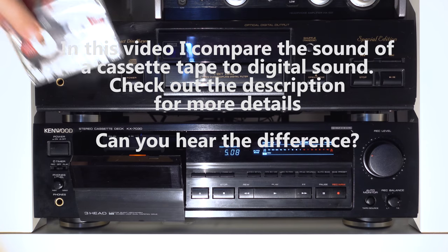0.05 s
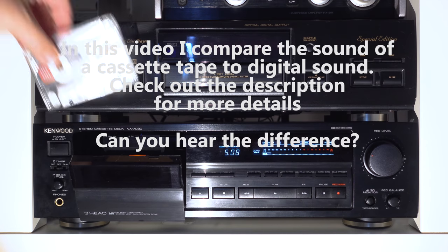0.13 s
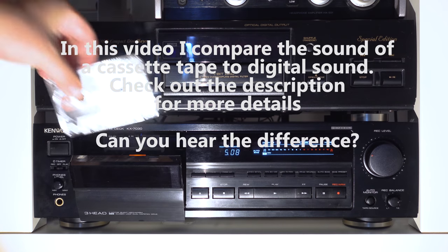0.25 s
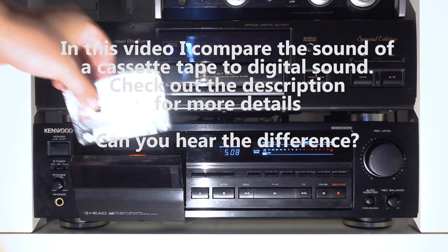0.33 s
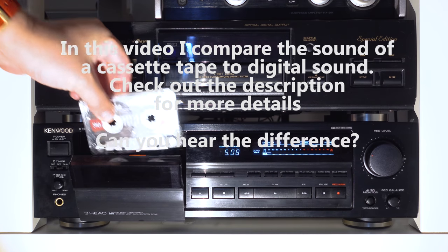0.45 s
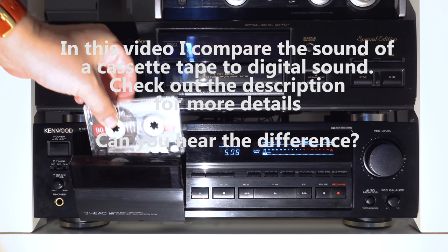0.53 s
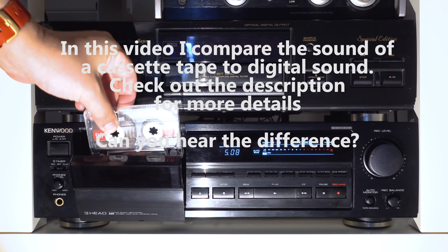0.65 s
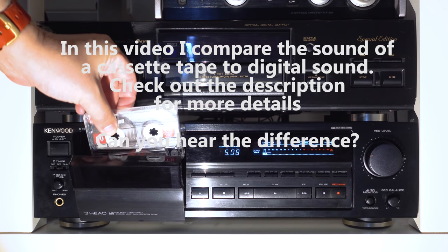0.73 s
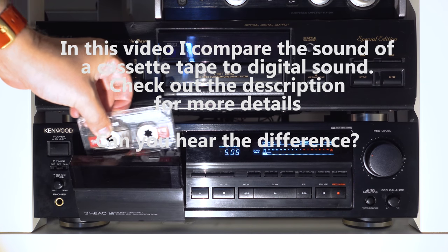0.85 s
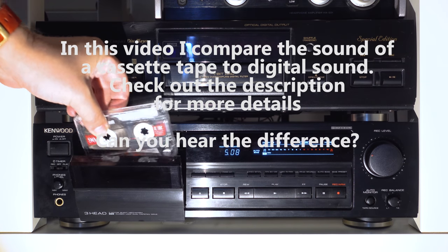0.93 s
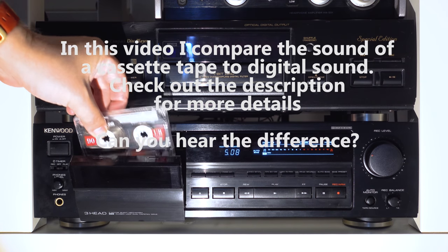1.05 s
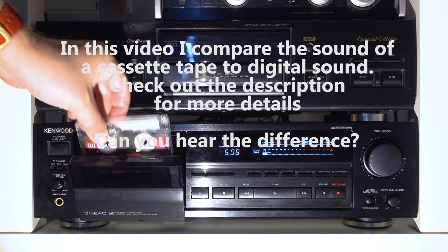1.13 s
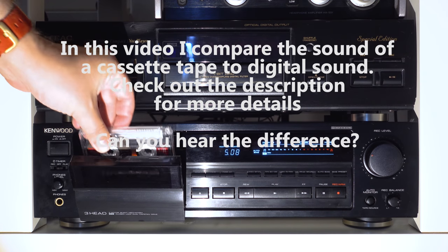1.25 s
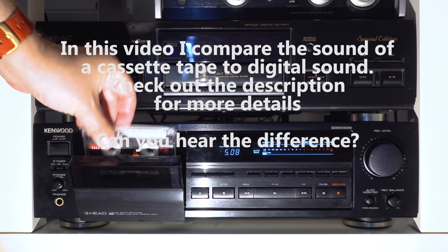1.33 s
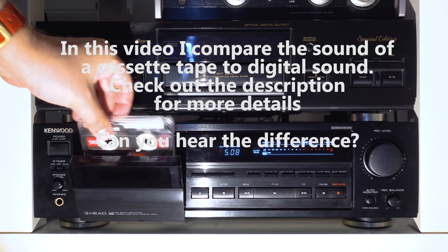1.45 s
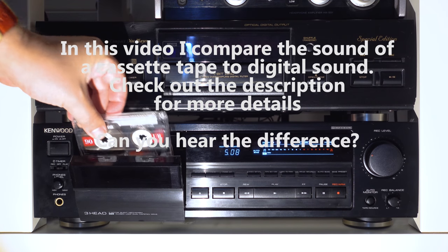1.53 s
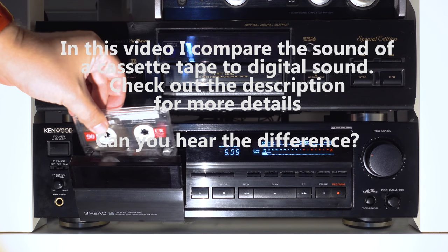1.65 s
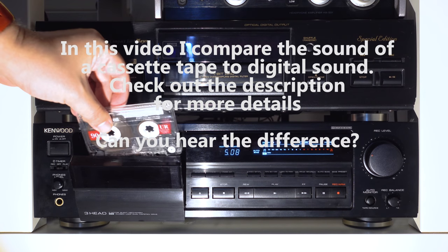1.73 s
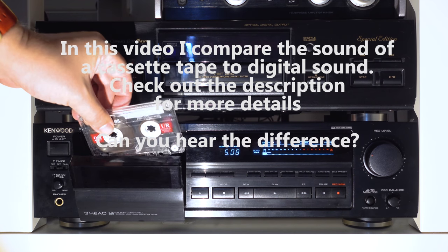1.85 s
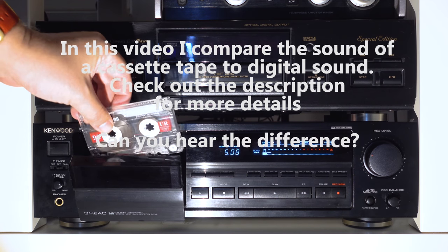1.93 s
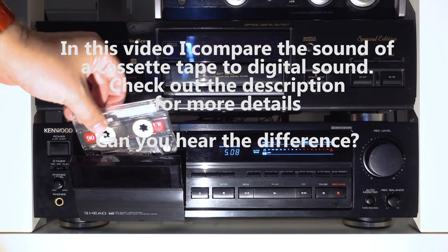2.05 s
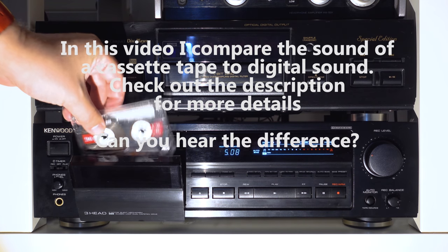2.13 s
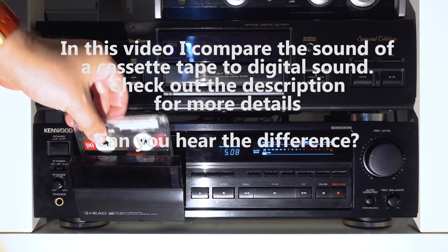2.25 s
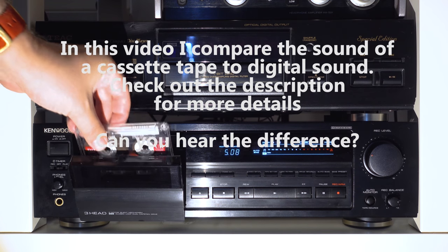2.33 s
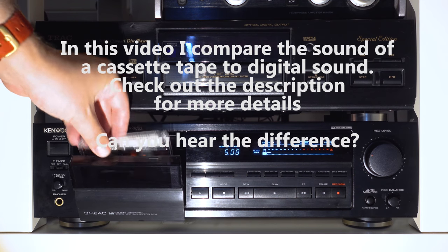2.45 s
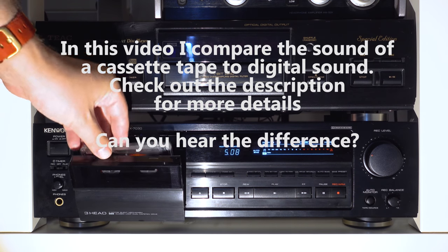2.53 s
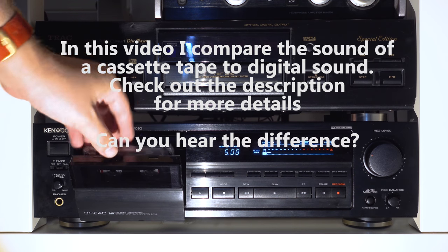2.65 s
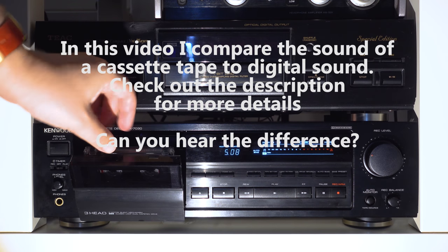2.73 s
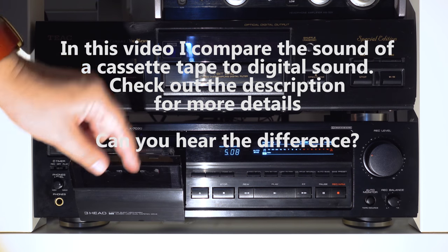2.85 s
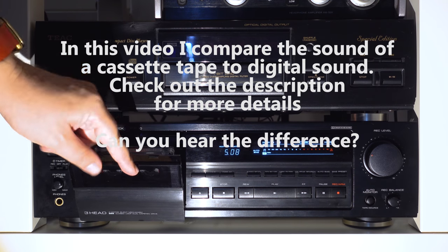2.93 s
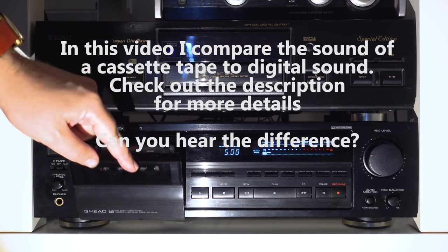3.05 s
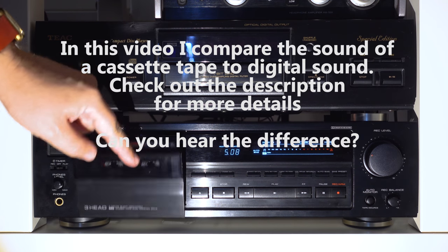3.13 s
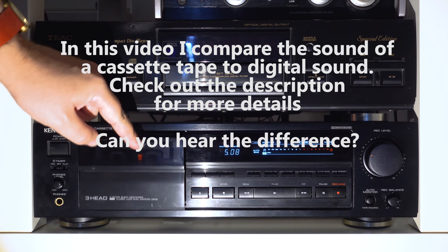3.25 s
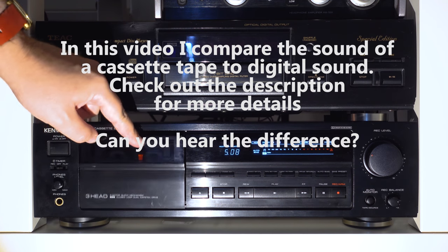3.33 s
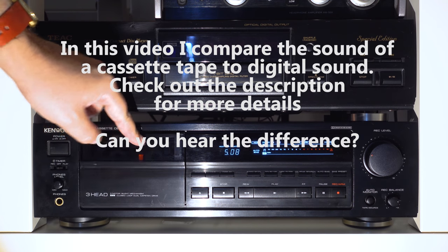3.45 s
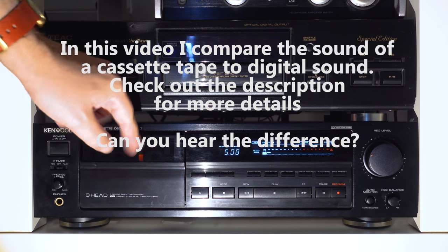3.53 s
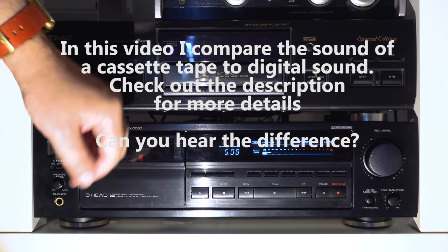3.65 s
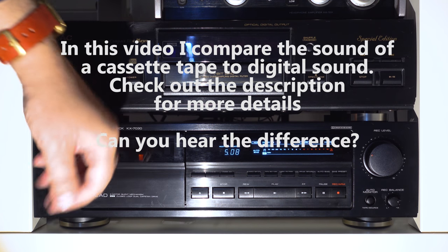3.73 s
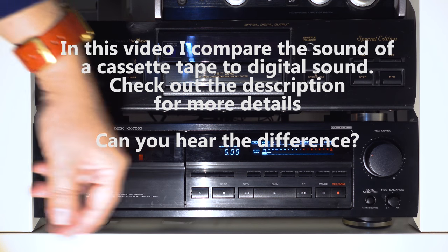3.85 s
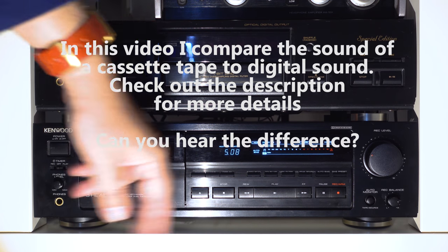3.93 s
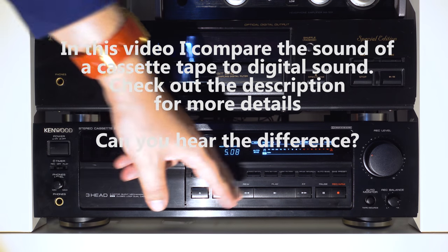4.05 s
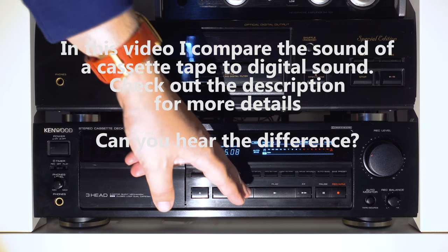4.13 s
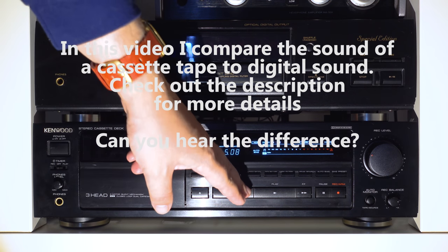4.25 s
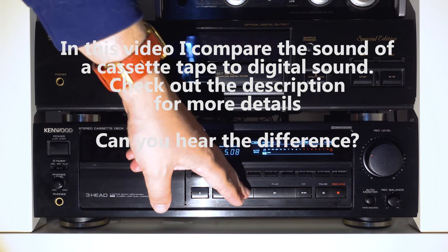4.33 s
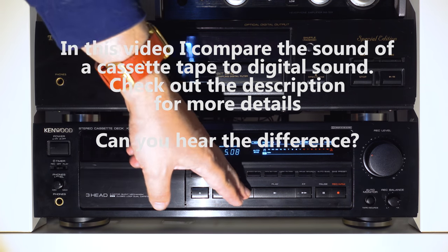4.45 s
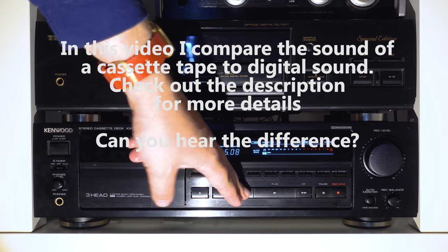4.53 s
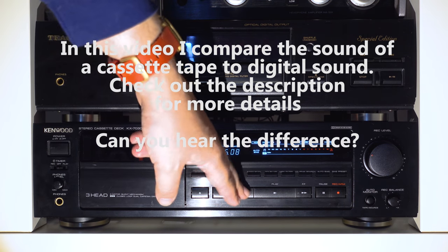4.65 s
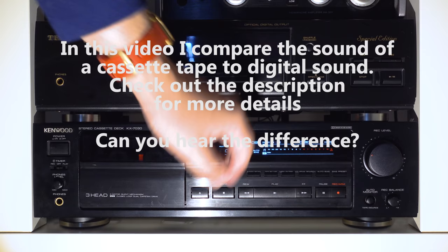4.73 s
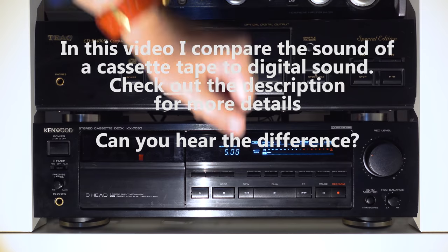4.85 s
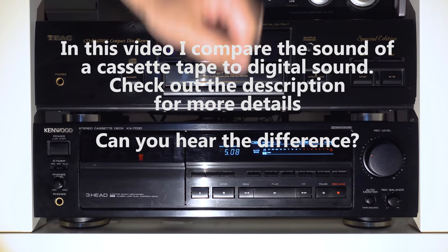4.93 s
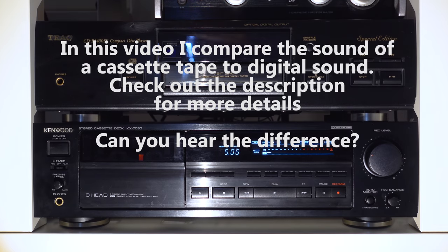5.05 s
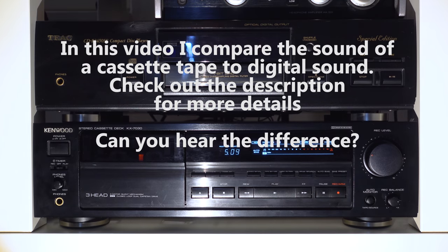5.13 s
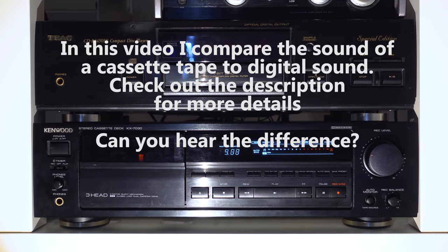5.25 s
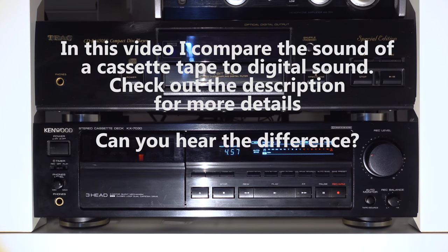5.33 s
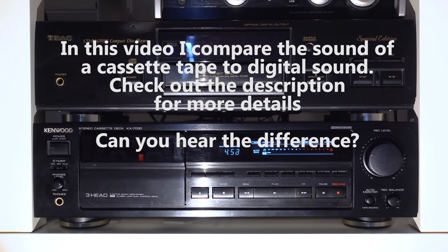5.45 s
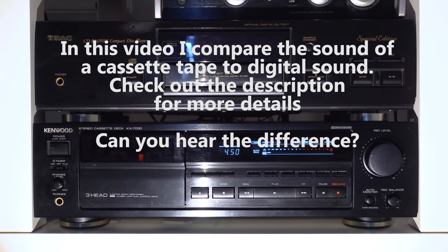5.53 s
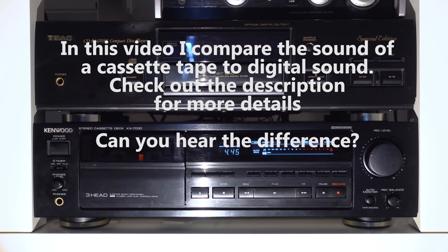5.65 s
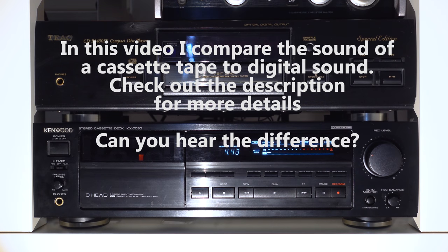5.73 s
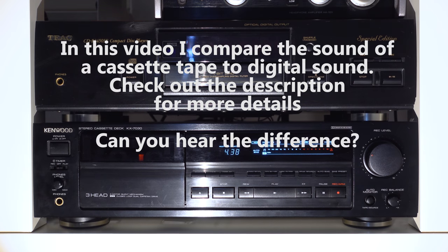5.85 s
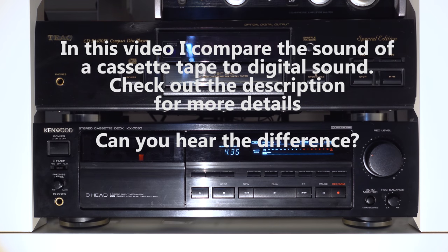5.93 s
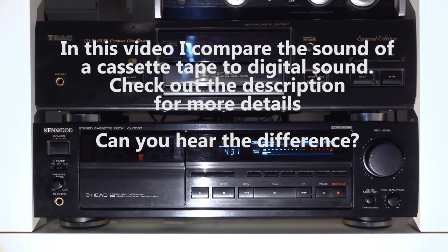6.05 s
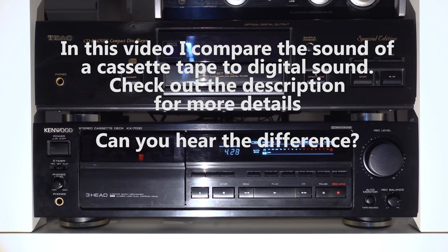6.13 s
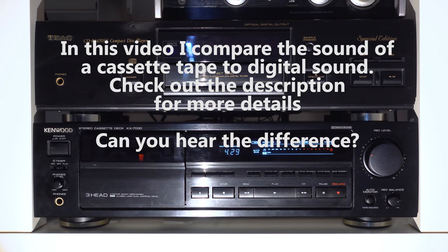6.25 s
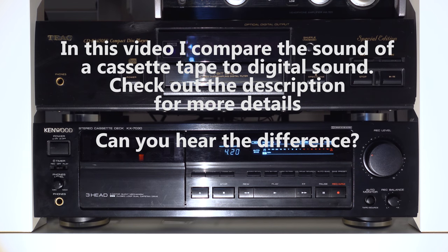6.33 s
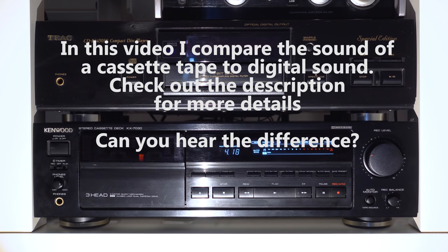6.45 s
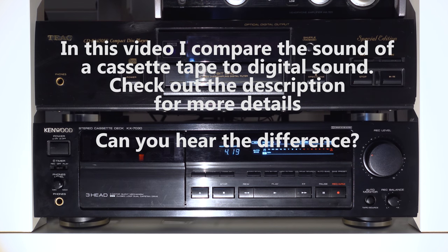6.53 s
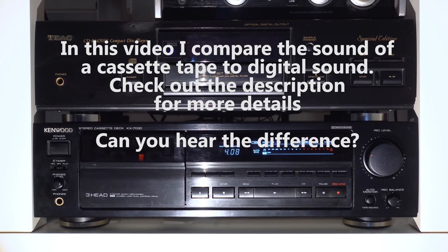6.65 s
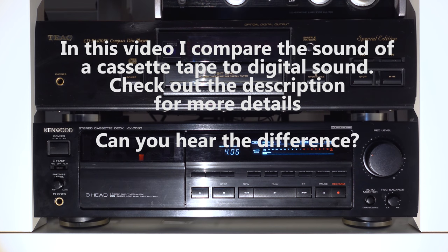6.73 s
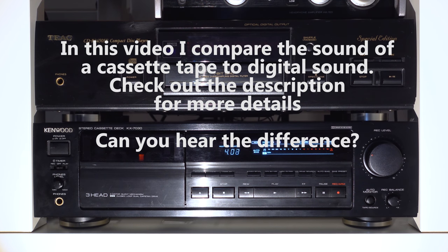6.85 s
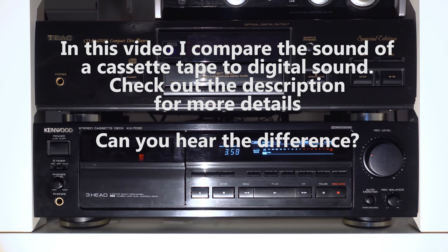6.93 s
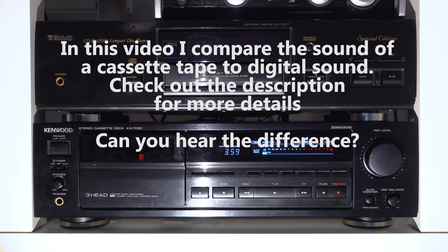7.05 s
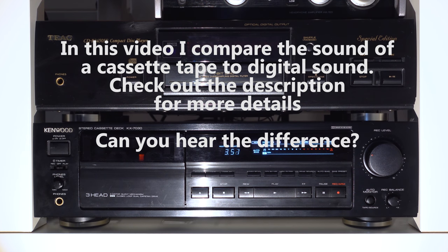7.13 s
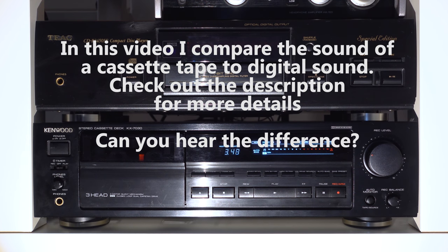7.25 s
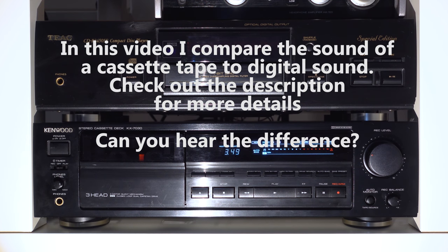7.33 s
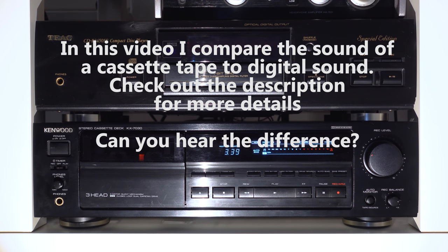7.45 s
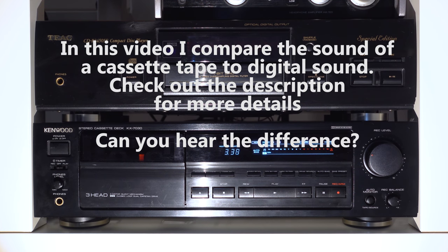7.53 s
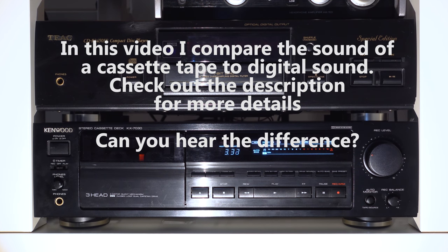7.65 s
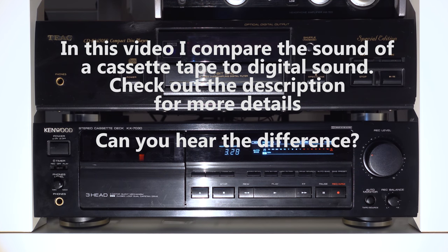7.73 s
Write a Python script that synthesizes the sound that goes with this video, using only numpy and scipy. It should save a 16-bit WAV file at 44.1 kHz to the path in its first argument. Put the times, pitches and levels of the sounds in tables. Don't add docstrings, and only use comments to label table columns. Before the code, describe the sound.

Close plastic cassette clatter and scraping at a tape deck, door clunks shut, a key clicks, then reels rewind with rapid rattling knocks.

```python
import sys
import numpy as np
from scipy import signal
from scipy.io import wavfile

SR = 44100
rng = np.random.default_rng(int(sys.argv[2]) if len(sys.argv) > 2 else 0)


def master_out(mix):
    frames = np.transpose(np.atleast_2d(mix))
    ceiling = np.clip(frames, -1, 1)
    pcm = np.round(ceiling * 32767).astype(np.int16)
    wavfile.write(sys.argv[1], SR, pcm)


def amplitude_ratio(level_db):
    exponent = np.asarray(level_db, float) / 20
    return 10 ** exponent


N = 343098

EDGES = 25 * 2 ** np.arange(0, 9.5, .5)
SEATED_S, CLOSING_S, KEYED_S = 1.4, 3.2, 4.3
# [f/Hz, width/Hz, level/dB]
HUB_MODES = [(1140, 120, 4), (1450, 100, 9.5), (1720, 200, 5), (2450, 690, -6), (3620, 610, -11)]


def rms_one(x):
    return x / np.sqrt(np.mean(x ** 2) + 1e-20)


def in_time(rows):
    s, *columns = np.transpose(rows)
    return [np.interp(np.arange(N) / SR, s, column) for column in columns]


def at_hz(points, hz):
    points_hz, values = np.transpose(points)
    return np.interp(np.log(hz), np.log(points_hz), values)


def band(x, low, high):
    return signal.sosfilt(signal.butter(2, [low, high], "band", fs=SR, output="sos"), x)


def steep(x, low, high):
    return signal.sosfilt(signal.butter(3, [low, high], "band", fs=SR, output="sos"), x)


def coloured(x, spectrum):
    out = 0
    for k, (low, high) in enumerate(zip(EDGES, EDGES[1:])):
        gain = amplitude_ratio(at_hz(spectrum, np.sqrt(low * high)))
        out = out + gain * band(x, low, high) * (-1) ** k
    return out


def resonances(x, peaks):
    out = 0
    for k, (hz, width, db) in enumerate(peaks):
        r = np.exp(-np.pi * max(width, 1.5) / SR)
        top = (1 - r * r) / 2 * amplitude_ratio(db) * (-1) ** k
        out = out + signal.lfilter([top, 0, -top], [1, -2 * r * np.cos(2 * np.pi * hz / SR), r * r], x)
    return out


def clicks(times, dbs):
    out = np.full(N, 1e-12)
    np.add.at(out, np.round(np.asarray(times) * SR).astype(int), amplitude_ratio(dbs))
    return out


def swell(x, rise_s, die_s):
    rise, die = np.exp(-1 / (rise_s * SR)), np.exp(-1 / (die_s * SR))
    dying = signal.lfilter([1], [1, -die], x + 1e-18)
    return signal.lfilter([1 - rise], [1, -rise], dying)


def bursts(times, dbs, die_s, noise):
    return noise * swell(clicks(times, dbs), 0.0015, die_s)


def bump(at_s, width_s):
    return np.exp(-((np.arange(N) / SR - at_s) / width_s) ** 2)


def wide_noise(size, gain):
    # [f/Hz, side over mid/dB]
    side_share = [(60, -15), (125, -21), (250, -14), (500, -10), (1000, -7.5), (2000, -5.5), (4000, 0),
                  (12000, 0.5)]
    out, white = 0, rng.standard_normal((2, 2, size))
    for k, (low, high) in enumerate(zip(EDGES, EDGES[1:])):
        hz = np.sqrt(low * high)
        mid, side = band(white[k % 2], low, high)
        out = out + gain(hz) * (mid + amplitude_ratio(at_hz(side_share, hz)) * side * [[1], [-1]])
    return out


def background():
    # [f/Hz, density/dB]
    floor = [(59, -9.5), (100, -8.5), (135, -17), (229, -9.5), (289, -24.5), (535, -19), (583, -23),
             (705, -34), (891, -18), (1420, -29.5), (2520, -31), (2860, -34.5), (16000, -53.5)]
    # [f/Hz, width/Hz, level/dB]
    room_modes = [(70.8, 5.5, 7.5), (106, 5.2, -2), (35.6, 14, -10.5)]
    # [t/s, width/s, level/dB]
    swells = [
        (.32, 0.14, -54),
        (.7, 0.087, -57),
        (2.0, 0.11, -55),
        (3.3, 0.07, -42.5),
        (3.52, 0.11, -48),
        (4.35, 0.13, -64),
        (4.72, 0.075, -54),
        (5.0, 0.068, -54),
        (5.901, 1, -68),
        (7.5, 0.26, -53),
    ]
    # [f/Hz, width/Hz, level/dB]
    hum_modes = [(860, 92, 0.5), (2450, 100, -1), (3300, 330, -35)]
    hush = band(wide_noise(N, lambda hz: amplitude_ratio(at_hz(floor, hz))), 49, 16500)
    swelling = amplitude_ratio(-58.5) + sum(amplitude_ratio(db) * bump(s, width) for s, width, db in swells)
    rumble = rms_one(resonances(rng.standard_normal(N), room_modes))
    engine = rms_one(resonances(rng.standard_normal(N), [(93.6, 8, 0)]))
    drone = amplitude_ratio(-51.5) * bump(7.15, 0.79) * engine
    hiss = amplitude_ratio(-70) * band(rng.standard_normal((2, N)), 3000, 16000)
    hum = amplitude_ratio(-71.5) * rms_one(resonances(rng.standard_normal(N), hum_modes))
    return amplitude_ratio(-56) * rms_one(hush) + hiss + hum + swelling * rumble + drone


def touches():
    # [t/s, clack peak/dB, thud/dB, edge/dB, ring f/Hz]
    tapping = [(0.02, -44, -51, -56, 1730), (0.046, -31, -56, -52, 1740), (0.127, -35.5, -50, -56, 1700),
               (0.638, -15.5, -25.5, -31.5, 1536), (0.668, -27, -36, -48, 1130),
               (0.69, -20.5, -32, -40, 1030), (0.71, -38, -55, -43.5, 1480),
               (0.838, -21.5, -32.5, -33, 2300), (0.978, -22, -40, -35.5, 1765),
               (0.99, -30, -40, -40, 2710), (1.003, -29, -37, -39.5, 994), (1.022, -31, -39, -49, 2490),
               (0.654, -28, -43, -49, 1060), (0.73, -30, -42, -48, 1480), (0.852, -36, -41, -51, 2400),
               (1.047, -29, -33.5, -44, 1470), (1.129, -48, -71, -76, 1540), (1.165, -33, -58, -51.5, 2330),
               (1.204, -35, -55, -51, 1740), (1.24, -36.5, -57, -63, 1430),
               (1.259, -33.5, -50, -45.5, 1650)]
    # [t/s, clack peak/dB, thud/dB, edge/dB, ring f/Hz]
    seating = [(1.461, -34.5, -60, -52, 1040), (1.473, -29, -37.5, -40, 775),
               (1.509, -29.5, -40, -46.5, 770), (1.538, -27.5, -62, -44.5, 1480),
               (1.614, -33, -33.5, -47.5, 750), (1.722, -36.5, -41, -53.5, 1600),
               (1.775, -28, -32, -49, 1800), (1.789, -17.5, -40, -32.5, 1720),
               (1.797, -17.5, -41, -35, 936), (1.812, -37, -30, -49, 800), (1.837, -24, -42, -37, 1750),
               (1.8608, -24, -50, -36, 1700), (2.13, -29.5, -29, -48, 1700),
               (2.154, -24.5, -33.5, -39.5, 1520), (2.165, -29, -35, -46, 1800),
               (2.231, -33, -58, -43, 980), (2.239, -27.5, -58, -44, 1900), (2.253, -11, -26.5, -23, 1740),
               (2.263, -19, -29.5, -34, 1194), (2.274, -27, -36, -48, 940), (2.443, -32, -55, -42.5, 3800),
               (2.529, -26.5, -47, -42, 1750), (2.543, -19.5, -26.5, -33, 1890),
               (2.571, -22.5, -46, -39.5, 1800), (2.767, -10, -21, -21.5, 1800),
               (2.804, -14, -16.5, -33, 1010), (2.995, -35, -61, -52, 1740), (3.034, -31.5, -42, -48, 919),
               (3.055, -40, -36, -41.5, 1220)]
    # [t/s, clack peak/dB, thud/dB, edge/dB, ring f/Hz]
    shutting = [(3.275, -44, -45, -56, 3250), (3.293, -40, -48, -54, 3280), (3.333, -20, -37, -35, 1010),
                (3.345, -25, -45, -39, 1400), (3.398, -29, -45, -42, 2000), (3.42, -31, -48, -46, 1500),
                (3.373, -27, -45, -40, 1700), (3.383, -23.5, -40.5, -42, 1900),
                (3.456, -27, -45, -42, 1500), (3.4612, -15, -33, -26, 1150), (3.469, -19, -28, -20.5, 660),
                (3.476, -19, -32, -25, 2050), (3.498, -17, -29, -33, 1130), (3.482, -19, -33, -28, 900),
                (3.51, -22, -29, -36, 640), (3.545, -23, -34, -40, 1130), (3.262, -40, -46, -62, 1400),
                (3.31, -38, -46, -58, 1500), (4.644, -45, -70, -39, 2600), (4.789, -22.5, -70, -29, 2720),
                (4.794, -29, -45, -36, 2200), (5.037, -44, -52, -57, 2000)]
    return np.transpose(tapping + seating + shutting)


def struck(hits):
    # [f/Hz, width/Hz, level/dB]
    loose_modes = [(240, 26, -4), (512, 22, 4), (727, 50, -6.5), (1070, 49, 1.5), (1488, 64, -1),
                   (2500, 200, -9), (6000, 150, -44), (8700, 250, -5)]
    # [f/Hz, width/Hz, level/dB]
    shell_modes = [(261, 10, -11), (500, 10.3, 5), (655, 28, -1), (770, 83, -3), (1127, 230, -10.5),
                   (1480, 23, 2.5), (1720, 170, -10), (2300, 100, -2.5), (3050, 570, -11), (3710, 200, 1.5),
                   (5730, 97, -40), (8600, 160, -33)]
    # [f/Hz, width/Hz, level/dB]
    door_modes = [(252, 71, 2.5), (270, 4.8, 16.5), (1110, 6, 7), (1194, 6, 6), (1290, 12, 0), (656, 14, 8),
                  (775, 34, -4), (1220, 34, -2), (1480, 71, -7.5), (1990, 18, -22), (2950, 410, -14.5),
                  (4830, 74, -32), (7900, 870, -6.5)]
    # [f/Hz, width/Hz, level/dB]
    key_modes = [(800, 78, -11.5), (1170, 45, 0), (2280, 200, -6), (2740, 140, -10), (3120, 150, -13),
                 (4330, 350, -9), (5100, 600, -18), (6500, 300, -20), (10800, 790, -25), (13400, 520, -13)]
    stage = np.searchsorted([SEATED_S, CLOSING_S, KEYED_S], np.arange(N) / SR)
    # (modes, dB, plain share)
    bodies = [(loose_modes, 6, .6), (shell_modes, 6, .6), (door_modes, 6, .6), (key_modes, 10, .25)]
    out = np.zeros(N)
    for k, (modes, db, plain) in enumerate(bodies):
        now = stage == k
        start = np.argmax(now)
        span = slice(start, start + np.sum(now) + SR)
        part = (hits * now + 1e-18)[span]
        out[span] += plain * part + amplitude_ratio(db) * resonances(part, modes)
    return out


def contacts():
    s, clack_db, thud_db, edge_db, ring_hz = touches()
    near, spread = 0, 0
    snap_db = edge_db + 3
    top_db = edge_db + 0.22 * (clack_db + 21) - 3.0
    registers = [(thud_db + 7.5, .012, 150, 700), (clack_db + 8.0, .004, 700, 2500),
                 (snap_db + 12.0, .0035, 2500, 6000), (edge_db + 8.5, .003, 6000, 11000),
                 (top_db, .009, 11000, 16000)]
    for db, die_s, low_hz, high_hz in registers:
        near = near + steep(bursts(s, db, die_s, rng.standard_normal(N)), low_hz, high_hz)
        spread = spread + steep(clicks(s, db) * np.sqrt(die_s * SR / 2), low_hz, high_hz)
    rings, t = np.zeros(N), np.arange(SR // 20) / SR
    ring_shape = np.exp(-t / 0.0079) * -np.expm1(-t / 0.00037)
    ring_db = np.where(ring_hz < 2500, clack_db - 6.0, snap_db)
    for start, db, hz in zip(s, ring_db, ring_hz):
        i = round(start * SR)
        rings[i:i + len(t)] += amplitude_ratio(db) * np.sin(2 * np.pi * hz * t) * ring_shape
    near = struck(near)
    to_walls = amplitude_ratio(-7.5) * (struck(spread) + 0.52 * near + 0.46 * rings)
    return near + rings, to_walls


def room(x):
    # [f/Hz, T60/s]
    room_t60 = [(100, 0.99), (300, 0.44), (1000, 0.5), (3000, 0.59), (6000, 0.67), (11000, 0.52),
                (16000, .45)]
    # [f/Hz, level/dB]
    room_colour = [(100, 9.5), (300, 7.5), (1000, 4), (3000, 4.5), (6000, 0.5), (16000, 0.5)]
    t = np.arange(SR) / SR
    tail = wide_noise(SR, lambda hz: amplitude_ratio(at_hz(room_colour, hz) - 60 * t / at_hz(room_t60, hz)))
    tail = tail * -np.expm1(-(t / .007) ** 2)
    return amplitude_ratio(-29.0) * signal.fftconvolve(x[None], tail, axes=1)[:, :N]


def sliding():
    # [f/Hz, density/dB]
    slide_spectrum = [(120, -22), (200, 2.5), (397, -3), (494, -3.5), (864, -0.5), (1490, 7), (2400, -5.5),
                      (6080, -22), (8570, -22), (15000, -76)]
    sizes = amplitude_ratio(5.1 * np.minimum(rng.exponential(1, N), 4))
    slips = sizes * rng.choice([-1, 1], N) * (rng.random(N) < 2500 / SR)
    s, clack_db = touches()[:2]
    stirred = swell(clicks(s, clack_db - 17), 0.015, .12)
    fingers = amplitude_ratio(-53.5) * (np.arange(N) < CLOSING_S * SR)
    return amplitude_ratio(-20.0) * (stirred + fingers) * rms_one(coloured(slips, slide_spectrum))


def loose_reels():
    s, clack_db = touches()[:2]
    happens = rng.random(N) < 160 / SR
    sizes = amplitude_ratio(2.4 * np.minimum(rng.exponential(1, N), 3)) * happens
    stirred = swell(clicks(s, clack_db - 19), 0.0078, .04)
    rattle = swell(sizes * stirred, 0.0043, 0.00016) * rng.standard_normal(N)
    return struck(band(rattle, 560, 4800))


def ticks():
    # [t/s, peak/dB, centre f/Hz]
    flicks = [(.828, -28, 7200), (1.004, -25, 7000), (1.015, -36, 8000), (1.026, -36, 7000),
              (3.033, -31, 4300), (3.056, -32, 6130), (.06, -39, 11000), (.12, -44, 11000),
              (3.305, -23, 3250), (1.2033, -28, 8750), (1.261, -25.5, 8600), (1.371, -35, 5200),
              (1.415, -44, 3520), (1.4437, -29, 3520), (1.7973, -13, 6300), (1.859, -44, 5800),
              (1.994, -47, 5000), (2.443, -21.5, 8460), (2.232, -30, 7000), (1.537, -30, 5700),
              (3.274, -34, 4840), (3.281, -39, 8700), (3.293, -30, 4900), (3.293, -30, 10300),
              (3.313, -34, 8900), (3.329, -27, 10000), (3.347, -28, 9000), (3.359, -27, 8850),
              (3.373, -28, 9700)]
    # [t/s, peak/dB, centre f/Hz]
    clutch = [
        (5.038, -29.5, 10600),
        (5.066, -28, 10800),
    ]
    # [t/s, peak/dB]
    catches = [(5.3552, -49), (5.3806, -44), (5.4041, -54), (5.4345, -46), (5.475, -38.5), (5.5014, -43),
               (5.5193, -43), (5.5498, -57), (5.6207, -42.5), (5.6475, -53), (5.7204, -59), (5.764, -39.5),
               (5.7906, -35), (5.8351, -50), (5.9094, -42), (5.932, -33), (5.9823, -41), (6.076, -38),
               (6.121, -42), (6.1768, -41.5), (6.1973, -47), (6.2178, -37.5), (6.2636, -42), (6.3617, -43),
               (6.4043, -60), (6.5181, -56), (6.547, -44), (6.5709, -50), (6.6014, -54), (6.6198, -51),
               (6.6626, -42.5), (6.689, -37.5), (6.761, -49), (6.8048, -44), (6.8458, -44), (6.8728, -49),
               (6.9112, -43), (6.9311, -44), (6.986, -56), (7.0138, -41), (7.0563, -49), (7.1681, -44),
               (7.1945, -40.5), (7.2384, -58), (7.3517, -51), (7.3763, -39), (7.4479, -44), (7.492, -43),
               (7.5348, -46), (7.556, -37.5), (7.6285, -44), (7.6684, -40.5), (7.6944, -53), (7.7188, -44),
               (7.7533, -45)]
    out, t = np.zeros(N), np.arange(900) / SR
    rows = [(*row, .1) for row in flicks] + [(*row, .25) for row in clutch]
    rows += [(s, db + 8, 7080, .4) for s, db in catches]
    shape = np.exp(-t / 0.004) * -np.expm1(-t / 0.00028)
    for (start, db, hz, broad), noise in zip(rows, rng.standard_normal((len(rows), 900))):
        burst = noise * shape
        i = round(start * SR)
        pitched = 0.42 * band(burst, hz / 1.122, hz * 1.07)
        out[i:i + 900] += amplitude_ratio(db) * (pitched + broad * band(burst, 1700, 10400))
    return out


def cabinet():
    # [t/s, level/dB]
    booms = [(0.64, -41.5), (.98, -39), (1.79, -40), (2.255, -41), (2.77, -31), (2.8, -30), (3.335, -45),
             (3.465, -32), (3.503, -29.5), (4.8, -49.5), (4.87, -46), (4.93, -49)]
    # [f/Hz, width/Hz, level/dB]
    cabinet_modes = [(140.2, 3, -4), (205.8, 5.9, 1.5), (278, 2.5, 5.5), (317, 5.8, -4.5),
                     (366.4, 6.3, -5.5), (640, 9.2, 1.5), (788, 14, 1.5)]
    # [f/Hz, width/Hz, level/dB]
    spring_modes = [(1112, 2.2, -2), (1134, 1.9, 0), (1194, 2.4, -1), (1491, 2.5, -12)]
    blows = swell(clicks(*np.transpose(booms)), 0.00011, 0.00012)
    latching = swell(clicks([3.465], [-15.5]), .0001, .0001)
    boom = resonances(1e-18 + blows, cabinet_modes)
    return amplitude_ratio(40.5) * (boom + resonances(1e-18 + latching, spring_modes))


def pings():
    # [t/s, peak/dB, f/Hz]
    ping_rows = [(3.4632, -9, 1170), (3.4656, -16, 1050), (4.6445, -48, 3100), (4.79, -29.5, 2200),
                 (5.6, -33, 800), (1.474, -39, 1510), (1.51, -36, 870), (1.4, -38, 1480),
                 (1.262, -35, 1480), (1.8374, -21, 1600), (1.8611, -15, 1710), (5.6, -29, 1040),
                 (0.71, -36, 1480), (0.695, -24, 1500), (1.028, -42, 1450), (2.568, -20, 1690),
                 (2.4, -25, 1750)]
    out, t = np.zeros(N), np.arange(900) / SR
    for start, db, hz in ping_rows:
        i = round(start * SR)
        out[i:i + 900] += amplitude_ratio(db) * np.sin(2 * np.pi * hz * t) * np.exp(-(t / 0.0026) ** 2)
    return out


def squeaks():
    # [t/s, length/s, from f/Hz, to f/Hz, level/dB]
    squeak_rows = [(1.515, .11, 1510, 1480, -41), (1.18, .08, 1500, 1490, -43), (2.8, .07, 1030, 1060, -25),
                   (1.163, .035, 2500, 2240, -39), (2.44, 0.027, 3850, 3900, -38),
                   (2.53, .055, 1830, 1860, -28), (5.96, 0.045, 14700, 14100, -59),
                   (6.0, .05, 14800, 15700, -60), (6.045, .05, 13100, 13700, -58),
                   (6.11, .07, 15400, 14300, -60), (6.23, .05, 14200, 14000, -59),
                   (6.3, .05, 13100, 12200, -59)]
    out = np.zeros(N)
    for start, length, from_hz, to_hz, db in squeak_rows:
        size, i = round(length * SR), round(start * SR)
        turns = np.cumsum(np.linspace(from_hz, to_hz, size)) / SR
        out[i:i + size] += amplitude_ratio(db) * np.hanning(size) * np.sin(2 * np.pi * turns)
    return out


def tape_rub():
    rub_s = 6.05
    press, out = bump(rub_s, 0.27), 0
    for k in range(5):
        mid_hz = 15300 - 1000 * k + 1800 * (press - 1)
        narrow = signal.butter(2, 350, fs=SR, output="sos")
        streak = signal.sosfilt(narrow, rng.standard_normal(N))
        flicker = amplitude_ratio(2.2 * rms_one(band(rng.standard_normal(N), 4, 30)) - 1.0 * k)
        out = out + flicker * streak * np.sin(2 * np.pi * np.cumsum(mid_hz) / SR)
    return amplitude_ratio(-56.5) * (0.73 * press + 0.28 * bump(rub_s + .1, 0.51)) * rms_one(out)


def gear_train():
    # [t/s, motor turns per s, idler turns per s]
    speeds = [
        (5.03, 41, 22),
        (5.12, 45, 29),
        (5.2, 63, 38),
        (5.3, 66.64, 40.14),
        (5.6, 69.91, 41.55),
        (6.0, 69.85, 42.18),
        (6.5, 70.35, 42.5),
        (7.0, 70.98, 43.29),
        (7.4, 72.35, 44.72),
        (7.78, 70.97, 42.68),
    ]
    # [f/Hz, density/dB]
    gear_spectrum = [(88, -76), (150, -12), (411, -6), (471, -24), (530, -33), (643, -21), (751, -5.5),
                     (1420, 0.5), (1900, -11), (2150, -15), (2550, -10.5), (5540, -25), (7860, -76),
                     (15500, -54)]
    # [f/Hz, width/Hz, level/dB]
    deck_modes = [(469, 14, -3), (652, 22, 4), (938, 12, 2), (1132, 30, -2), (1450, 24, 5), (1195, 25, -2),
                  (1950, 45, -2), (2505, 45, -5), (2600, 70, -8), (4230, 300, -26), (4820, 41, -29),
                  (6400, 150, -58), (7800, 210, -22), (10760, 310, -27)]
    start_s, engaged_s, play_s = speeds[0][0], 5.3, .0004
    t, noise = np.arange(N) / SR, rng.standard_normal((3, N))
    since = np.maximum(t - start_s, 0)
    gear_db = -40.5 - 3 * np.exp(-since / 0.48) - 0.5 * since
    growl_db = -54.5 + 22 * np.minimum(since, .2)
    taps, turned = np.zeros(N), []
    for speed, lead_turns, db in zip(in_time(speeds), (.15, .73), (0.1, -1)):
        turns = np.cumsum(speed) / SR
        turned.append(turns - turns[round(engaged_s * SR)] + lead_turns)
        at = np.flatnonzero(np.diff(np.floor(turned[-1]))) / SR
        chance = rng.standard_normal((2000, 2))[:len(at)]
        tap_s = np.minimum(at + play_s * chance[:, 0], (N - 1) / SR)
        taps += clicks(tap_s, db + 3.5 * chance[:, 1])
    chatter = noise[0] * (.15 + swell(taps, .0008, .003))
    gears = rms_one(coloured(chatter, gear_spectrum))
    gears += amplitude_ratio(-3) * rms_one(resonances(chatter, deck_modes))
    gears += .45 * rms_one(resonances(swell(taps, .00005, .00008), HUB_MODES))
    wide = steep(noise[1], 7500, 15700)
    whine = amplitude_ratio(-82) * rms_one(resonances(wide, [(10800, 350, 0)]))
    hiss = amplitude_ratio(-69.5) * rms_one(wide) + tape_rub() + whine
    rough = 1 + 0.44 * rms_one(band(noise[2], 21, 59))
    fifth_order = np.sin(2 * np.pi * 5 * turned[0])
    growl = amplitude_ratio(growl_db) * rough * fifth_order * np.clip((5.3 - t) / .08, 0, 1)
    running = np.clip((t - start_s) / 0.25, 0, 1)
    hissing = np.clip((t - 4.85) / 0.051, 0, 1)
    return running * amplitude_ratio(gear_db - 4.0) * gears + hissing * hiss + (running > 0) * growl


def rewinding():
    # [t/s, peak/dB]
    knocks = [(5.195, -29.5), (5.249, -27), (5.3551, -25.5), (5.383, -30), (5.4045, -30), (5.431, -31),
              (5.502, -23.5), (5.55, -25), (5.6255, -31), (5.648, -22), (5.774, -40), (5.7906, -21.5),
              (5.8381, -20.5), (5.918, -25), (5.9342, -20), (5.979, -26), (6.0599, -32), (6.0773, -21),
              (6.1058, -29), (6.1226, -19.5), (6.155, -28), (6.198, -28), (6.2183, -20.5), (6.2638, -19.5),
              (6.293, -32), (6.363, -27), (6.4047, -20), (6.4774, -24),
              (6.888, -29), (6.905, -31), (7.21, -26), (7.225, -29), (6.5464, -18), (6.592, -29),
                    (6.622, -28), (6.6464, -41), (6.6708, -33), (6.688, -20), (6.7348, -25), (6.7607, -27),
                    (6.8303, -26), (6.8737, -19.5), (6.9892, -35), (7.015, -20), (7.0566, -24),
                    (7.1302, -33), (7.195, -18.5), (7.2373, -23), (7.265, -39), (7.317, -30), (7.3342, -32),
                    (7.3772, -19.5), (7.419, -24), (7.493, -27), (7.517, -26), (7.5568, -16), (7.6294, -21),
                    (7.6961, -35), (7.7386, -25)]
    # [t/s, peak/dB]
    thumps = [
        (5.05, -28),
        (5.114, -31),
        (5.16, -27),
        (5.224, -26.5),
        (5.283, -46),
        (5.333, -30),
        (5.389, -45),
        (5.489, -32),
    ]
    s, knock_db = np.transpose(knocks) + [[0], [3]]
    rebound_s = s + 0.002184 * rng.uniform(0.92, 1.05, len(s))
    hits = clicks(s, knock_db) - 0.42 * clicks(rebound_s, knock_db)
    blow = swell(hits, 0.00044, 0.000083)
    blow += .06 * bursts(s, knock_db, .003, rng.standard_normal(N))
    out = gear_train() + amplitude_ratio(21.0) * resonances(blow, HUB_MODES)
    thump = swell(clicks(*np.transpose(thumps)), 0.0001, 0.000074)
    return out + amplitude_ratio(26.5) * resonances(thump, [(662, 25, -0.92), (309, 8.3, 0.0)])


def scene():
    near, spread = contacts()
    slide = sliding() + loose_reels()
    rewind = rewinding() + ticks()
    squeak = squeaks() + pings()
    boom = cabinet()
    to_walls = spread + .9 * slide + .42 * rewind + .15 * squeak + .1 * boom
    direct = near + slide + rewind + squeak + boom
    apart = amplitude_ratio(-3) * np.roll(band(direct, 5000, 16000), shift=round(SR / 3000))
    return direct + apart * [[1], [-1]] + room(to_walls) + background()


def band_limit(x):
    return signal.sosfilt(signal.butter(12, 16460, fs=SR, output="sos"), x)


def record(dry):
    mid = dry.mean(axis=0)
    side = signal.lfilter(*signal.butter(1, 380, "high", fs=SR), (dry[0] - dry[1]) / 2)
    mix = mid + side * [[1], [-1]]
    mix = signal.sosfilt(signal.cheby2(10, 40, 16300, fs=SR, output="sos"), mix)
    return band_limit(mix)


dry = scene()
out = record(dry)
master_out(out)
```